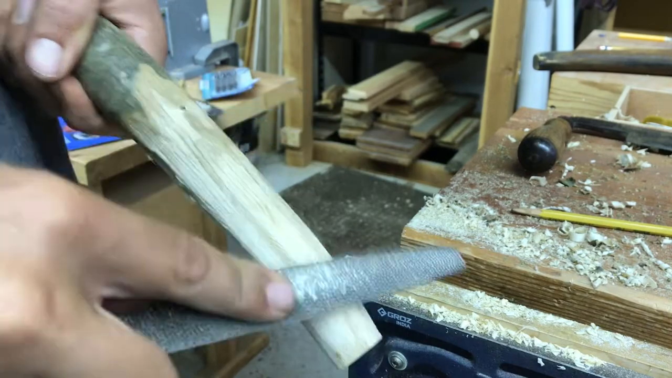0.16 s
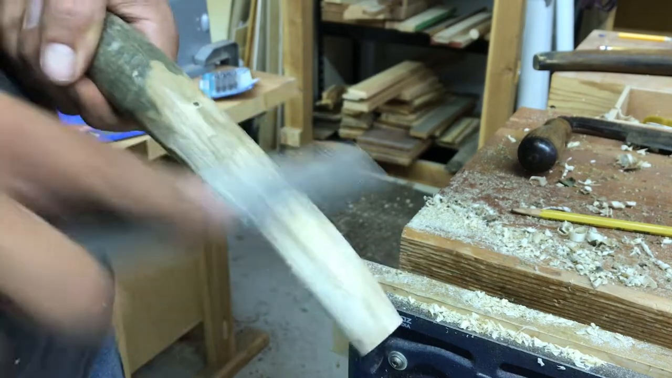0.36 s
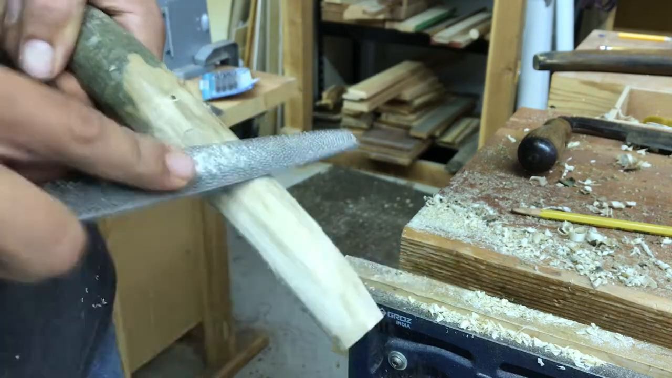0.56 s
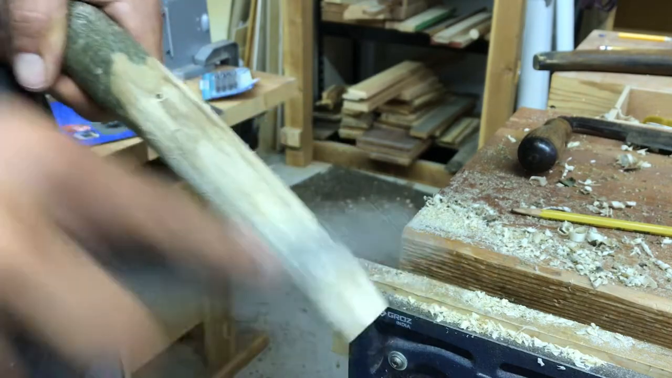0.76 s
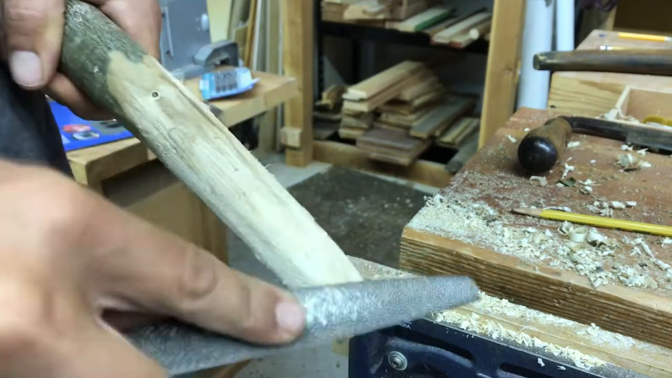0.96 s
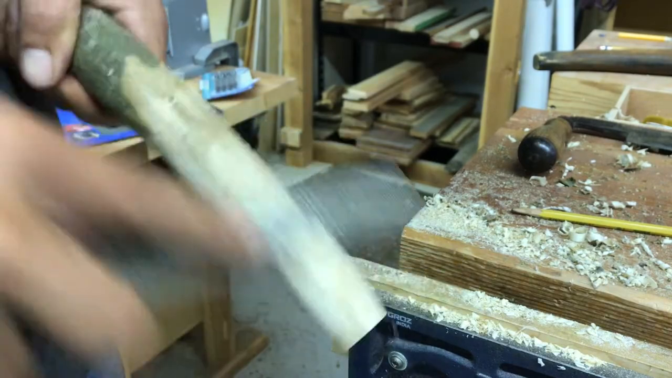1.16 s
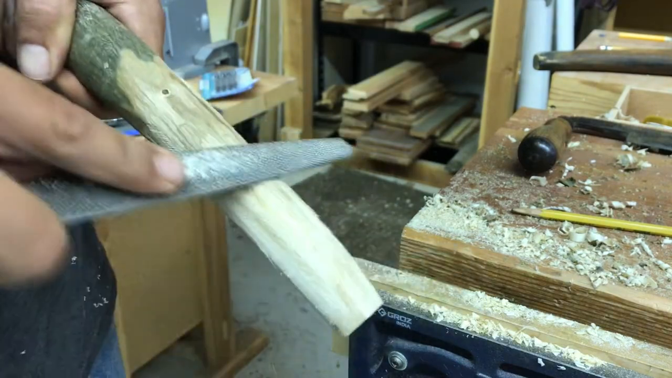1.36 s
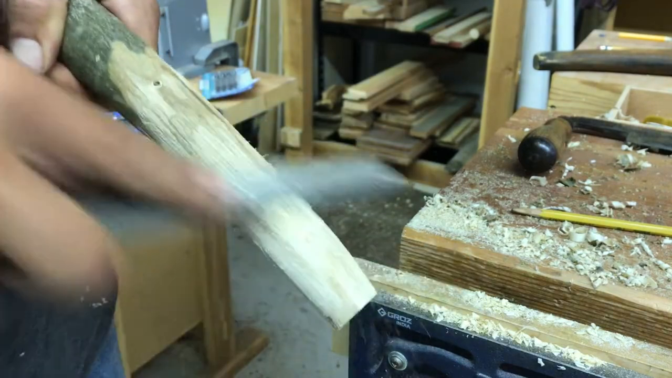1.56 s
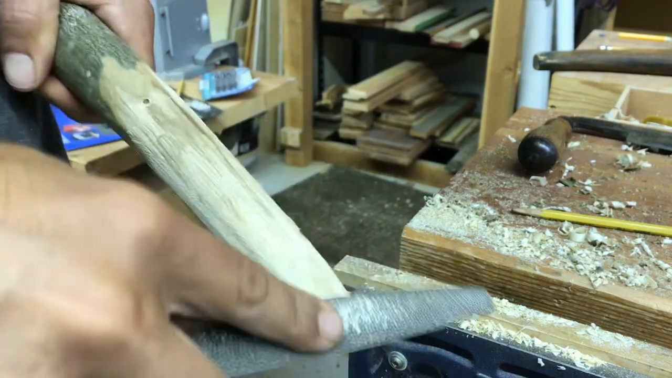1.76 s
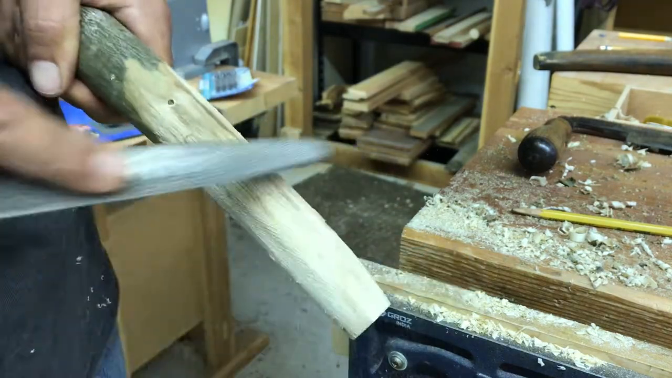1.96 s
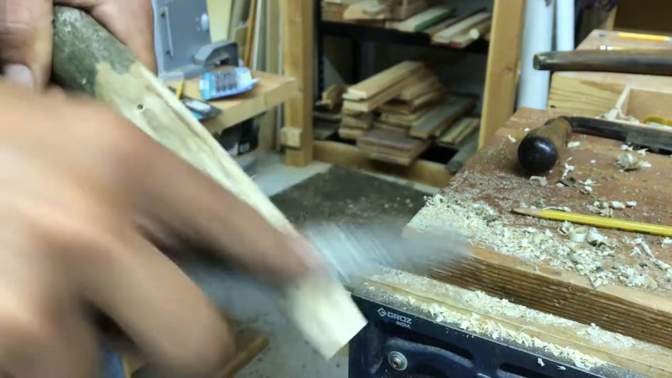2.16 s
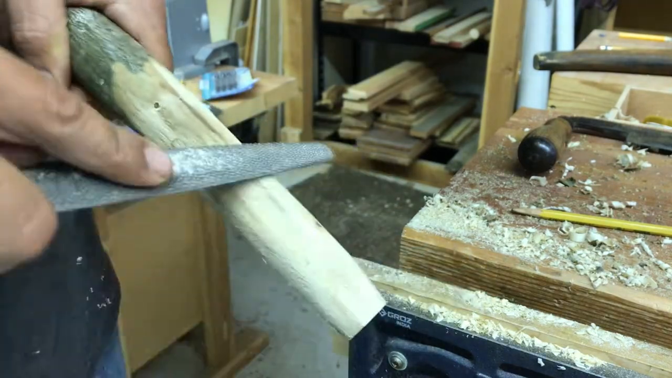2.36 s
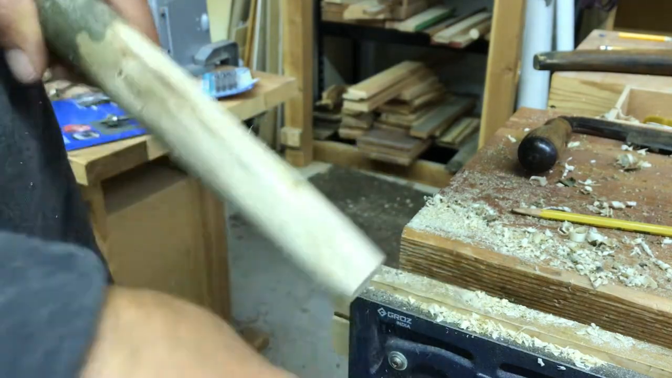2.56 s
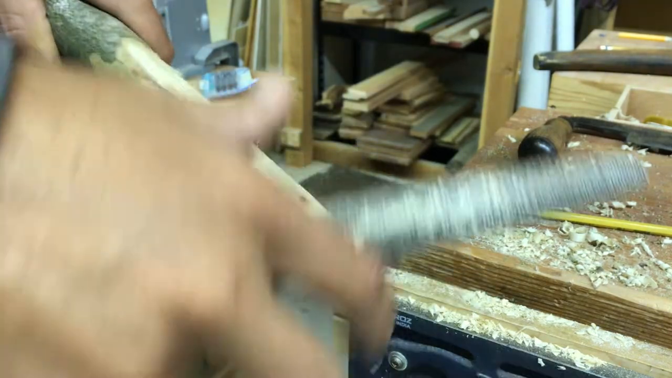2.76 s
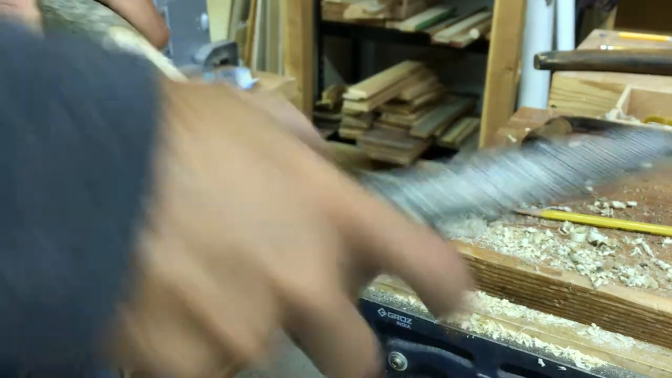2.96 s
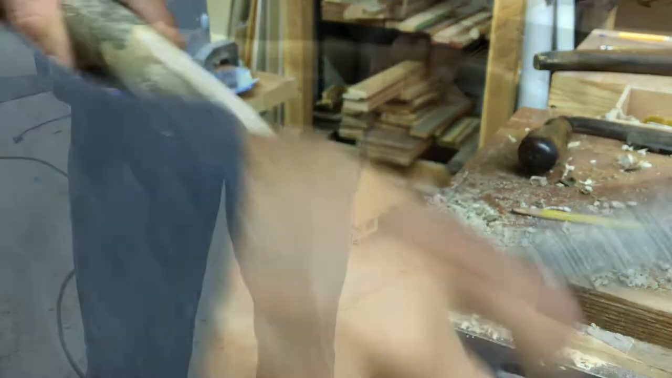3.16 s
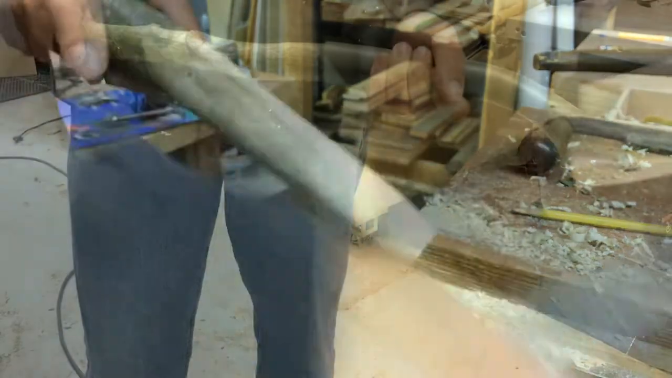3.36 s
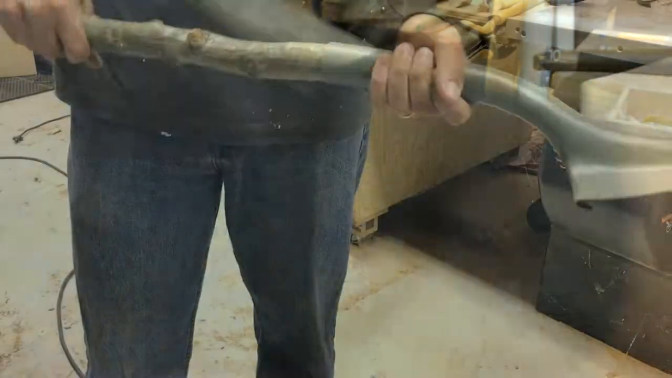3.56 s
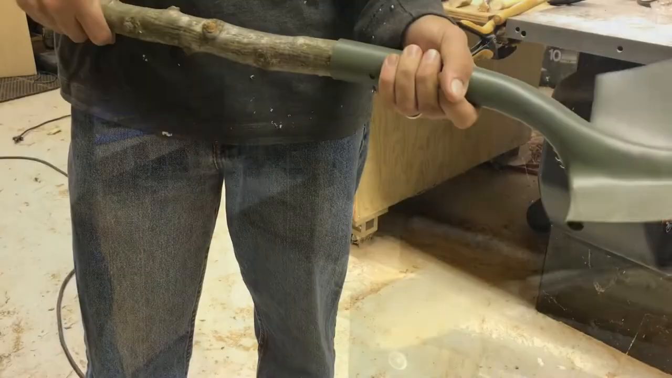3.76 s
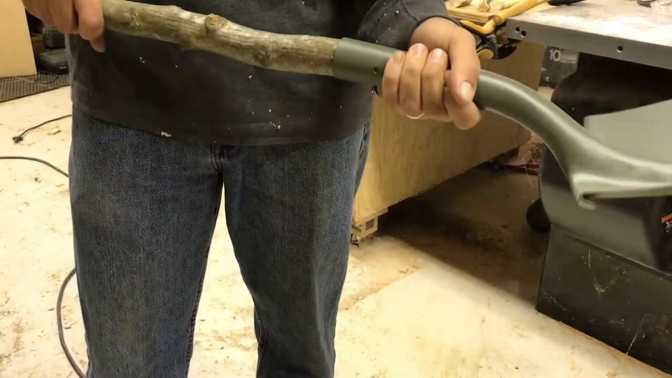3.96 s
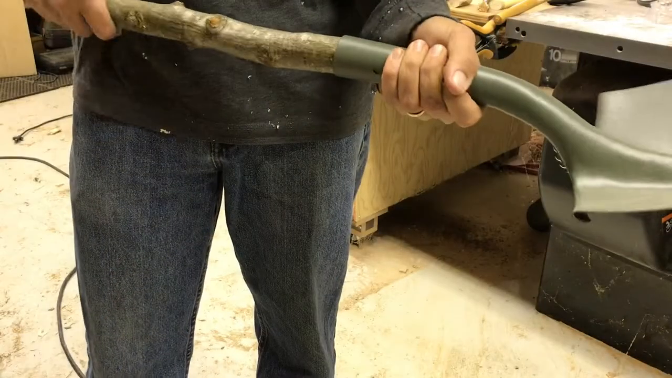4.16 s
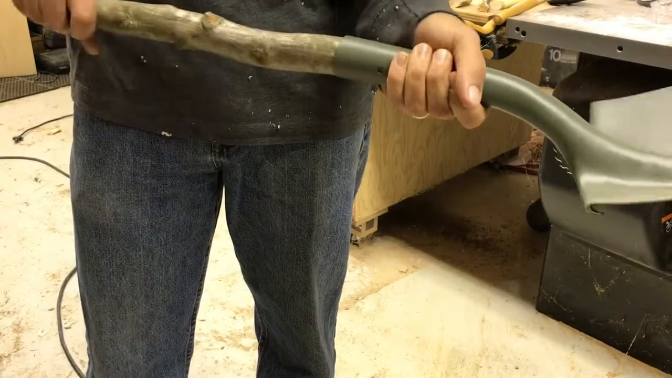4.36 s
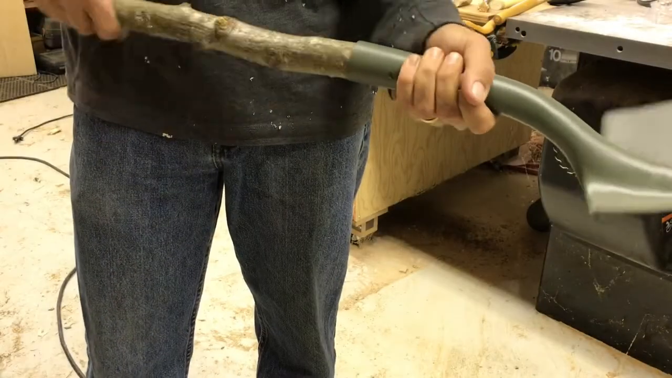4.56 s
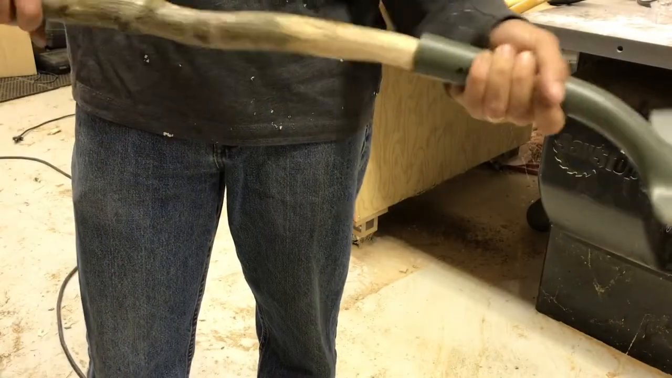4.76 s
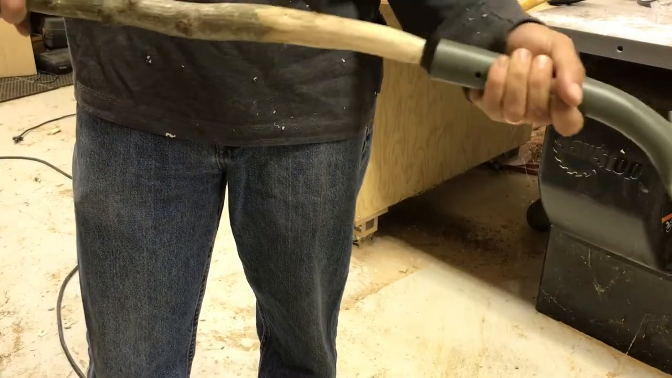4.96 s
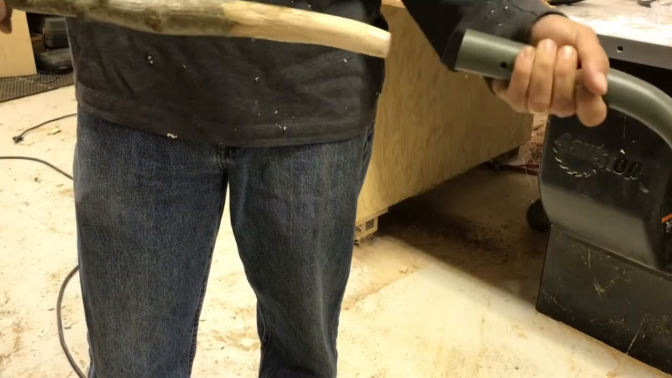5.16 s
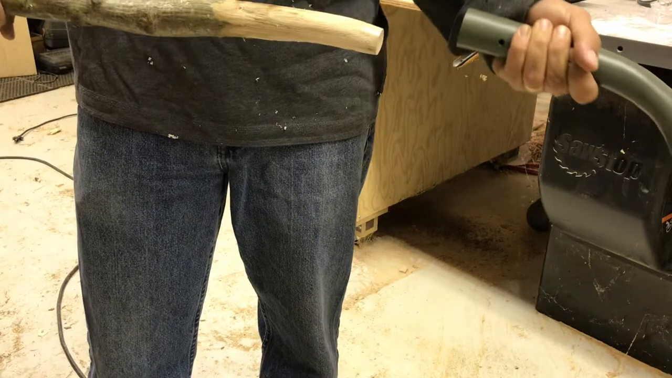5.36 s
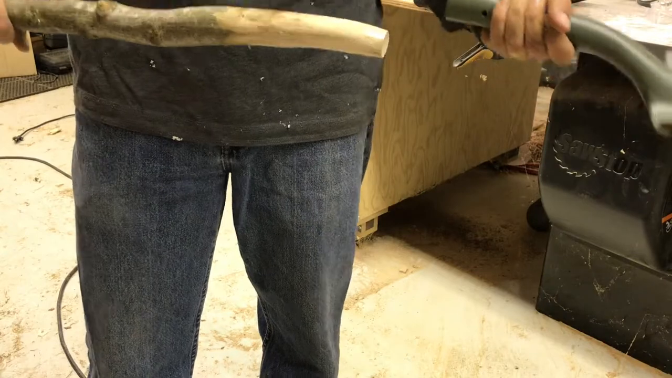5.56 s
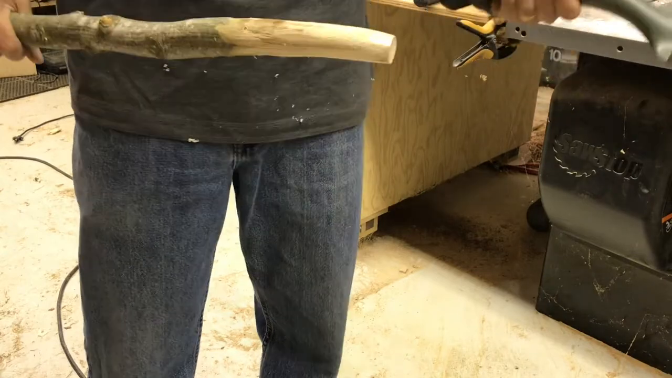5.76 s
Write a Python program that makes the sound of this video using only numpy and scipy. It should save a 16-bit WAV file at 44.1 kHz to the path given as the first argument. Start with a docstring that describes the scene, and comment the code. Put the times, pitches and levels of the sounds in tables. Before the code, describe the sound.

A steel rasp scrapes quickly back and forth on wood, a sharp knock follows, then wood grinds and pops free of a ringing metal socket.

```python
"""A low, wavering workshop hum, rumble and room hiss lie under everything.
First a steel rasp strokes to and fro over a branch held against a bench vice: noisy tooth bites drive wood, bench
and steel resonances. Small ticks and taps of the rasp on the branch come among the last strokes.
Then the branch jerks in a shovel's steel socket, with two more ticks among the later jerks: grinding noise drives
the steel, and knocks sound the air in the tube and a damped blade. At last it pops free and the blade rings undamped."""
import sys
import numpy as np
from scipy import signal
from scipy.fft import rfft, irfft, next_fast_len
from scipy.io import wavfile
from scipy.ndimage import uniform_filter1d, map_coordinates

SR = 44100
rng = np.random.default_rng(int(sys.argv[2]) if len(sys.argv) > 2 else 0)


def output_pcm(signal):
    """Save a mono or channel-first signal as 16-bit PCM at the path in sys.argv[1].

    Samples are clipped to [-1, 1] before scaling.
    """
    pcm = np.clip(np.atleast_2d(signal).T, -1, 1) * 32767
    wavfile.write(sys.argv[1], SR, np.round(pcm).astype(np.int16))


N = 255780
TIME = np.arange(N) / SR


def amp(db):
    """Gain of a level in dB."""
    return 10 ** (np.asarray(db) / 20)


def unit(x):
    """x at rms 1."""
    return x / np.sqrt(np.mean(x ** 2) + 1e-20)


def along(points, hz):
    """(Hz, value) points joined up on a log frequency axis."""
    f, v = np.transpose(points)
    return np.interp(np.log(hz + 1), np.log(f + 1), v)


def curves(rows):
    """One value per sample for each column after the time."""
    s, *columns = np.transpose(rows)
    return [np.interp(TIME, s, column) for column in columns]


def wobble(rate):
    """A smooth random curve with rate knots a second."""
    knots = rng.standard_normal(int(N * rate / SR) + 4)
    return map_coordinates(knots, [TIME * rate])


def filtered(x, response):
    """x through a complex response of frequency."""
    m = next_fast_len(N + SR // 2)  # spare length for the ringing
    spectrum = rfft(x, m) * response(np.fft.rfftfreq(m, 1 / SR))
    return irfft(spectrum, m)[..., :N]


def body(modes):
    """Causal response of a struck or shaken body: a sum of (Hz, width, dB) resonances of alternate sign."""
    def response(f):
        total = 0
        for k, (centre, width, db) in enumerate(modes):
            resonance = 1j * f * width / (centre * centre - f * f + 1j * f * width)
            total = total + (-1) ** k * amp(db) * resonance
        return total
    return response


def colour(points):
    """Response of a (Hz, dB) spectrum."""
    return lambda f: amp(along(points, f))


def bites(scatter_db, clump_db, clump_rate):
    """Dense small bites: noise with scattered sizes that come in clumps."""
    size_db = scatter_db * rng.standard_normal(N) + clump_db * wobble(clump_rate)
    return unit(rng.standard_normal(N) * amp(size_db))


def patchy(x, patchy_db):
    """x with patches of random gain over time and frequency."""
    z = signal.stft(x, nperseg=256)[2]
    field = uniform_filter1d(rng.standard_normal(z.shape), size=4, axis=0)  # smooth over frequency
    field = uniform_filter1d(field, size=7, axis=1)  # smooth over time
    return unit(signal.istft(z * amp(patchy_db * unit(field)), nperseg=256)[1][:N])


def driven(force, gain, response):
    """The force under its gain through a response, scaled so that steady force gives rms 1."""
    return filtered(force * gain, response) / np.std(filtered(force, response))


def movement(start, up, down, power):
    """Span, loudness and share of the way done for a hand whose speed swells and falls as a sine.

    Loudness goes with a power of the speed: power = (while speeding up, while slowing down).
    """
    span = slice(max(round(start * SR), 0), round((start + up + down) * SR))
    t = TIME[span] - start
    swell = np.abs(np.sin(np.pi / 2 * t / up)) ** power[0]
    fall = np.abs(np.cos(np.pi / 2 * (t - up) / down)) ** power[1]
    return span, np.where(t < up, swell, fall), t / (up + down)


# rumble and hiss before their trims: t/s, rumble level/dB, hiss level/dB
ROOM_LEVELS = [(0.0, -51, -61), (1.9, -53.5, -63), (3.07, -52, -66.5), (3.8, -54, -71), (4.5, -52.5, -65.5),
               (5.45, -53.5, -69.5)]
# hum before it wavers: t/s, f/Hz, level/dB
HUM_PATH = [(0, 98.54, -74), (3.3, 98.3, -51), (3.7, 90.1, -64.5), (4.4, 80.8, -57.5), (5.0, 89.16, -53),
            (5.8, 83.7, -66)]
# rumble spectrum: f/Hz, relative level/dB
RUMBLE_SPECTRUM = [(15, -45), (25, -54), (48, 2), (92, 6), (109, 1.5), (124, -30), (150, -5), (200, -43),
                   (330, -120)]
# hiss spectrum: f/Hz, relative level/dB
HISS_SPECTRUM = [(70, -29.5), (120, -10.5), (170, -7), (350, -8.5), (450, -14), (1000, -14.5), (2000, -20),
                 (3100, -23), (6500, -31), (8000, -32.5), (10500, -35), (12500, -32.5), (15200, -32.5),
                 (15700, -65.5)]


def workshop():
    """A sine hum wavering in pitch and level, over two bands of shaped noise: low rumble and room hiss."""
    rumble_db, hiss_db = curves(ROOM_LEVELS)
    hum_hz, hum_db = curves(HUM_PATH)
    waver_db = 2 * wobble(16)
    hum_cycles = np.cumsum(hum_hz + 3.35 * wobble(8.7)) / SR
    hum = amp(hum_db + waver_db) * np.sin(2 * np.pi * hum_cycles)
    rumble = unit(filtered(rng.standard_normal(N), colour(RUMBLE_SPECTRUM)))
    flickering_noise = rng.standard_normal(N) * amp(0.35 * wobble(25.03))
    hiss = unit(filtered(flickering_noise, colour(HISS_SPECTRUM)))
    return hum + amp(rumble_db - 4.0) * rumble + amp(hiss_db + 6) * hiss


# rasp strokes: start t/s, speeding up t/s, slowing down t/s, teeth level/dB, then relative to the teeth:
# branch level/dB, its upper modes level/dB, bench thrum level/dB; last, branch gain along the stroke/dB
RASP_STROKES = [(-.02, 0.1, 0.01, -43.5, -5.5, -5, -8.5, 5), (0.103, 0.089, 0.07, -38.5, -7, -3.5, -6, 11),
                (.26, 0.074, 0.041, -46.5, -5.5, -4, -7, -4),
                (0.413, 0.049, 0.068, -36.5, -6.5, -4.5, -7, 15),
                (0.537, .065, 0.044, -45, -5.5, -8.5, 0, -8), (0.667, 0.072, 0.052, -40.5, 0, 1, -3, 13),
                (0.794, 0.038, 0.0093, -47.5, 5.5, 0, 0, -11), (0.838, 0.028, 0.053, -44, -4.5, -4, 0, -3),
                (0.923, 0.084, 0.044, -39.5, -2.5, 1, -3.5, 12),
                (1.063, 0.036, 0.076, -43.5, -2, -4.5, -0.5, -10),
                (1.196, .055, 0.047, -39.5, -4, -0.5, -6.5, 11), (1.32, 0.053, 0.058, -46, 0, -3, -0.5, 3),
                (1.452, .06, 0.045, -36.5, -4.5, -0.5, -5, 8),
                (1.575, 0.069, 0.042, -43.5, -4, -5.5, -2, -5), (1.719, 0.051, .08, -36.5, 0, 2, -4.5, 7),
                (1.853, 0.061, 0.012, -57, 10, 3.5, 6, -3), (2.083, 0.074, 0.12, -33.5, -2.5, 0, -4.5, 14),
                (2.435, .1, 0.025, -33, -2, -3, -5.5, 13), (2.975, 0.061, 0.14, -51.5, -7, -8.5, -5.5, -19)]
# teeth catch on a ridge and jolt the branch: start t/s, length t/s, low modes level/dB, upper modes level/dB
RIDGE_CATCHES = [(0.063, .025, -43, -56), (0.11, 0.034, -37, -40.5), (0.415, 0.018, -48, -44.5),
                 (0.94, 0.019, -46, -36), (2.083, 0.022, -47, -58), (2.54, 0.019, -31.5, -30.5),
                 (2.979, 0.021, -36, -49.5), (3.011, 0.05, -40.5, -46.5)]
STROKE_POWER, CATCH_POWER = (1.05, 1.8), (1.1, 4.5)  # of the speed: (speeding up, slowing down)
BODY_FOLLOWS = 0.82  # the bodies swing less than the teeth: exponent on the stroke's loudness
CATCH_RISE = 0.4  # share of a catch spent rising


def stroke_gains():
    """Gains of teeth, branch, its upper modes and bench; the contact travels, so the branch swells or fades."""
    out = np.zeros((4, N))
    for start, up, down, db, low_db, high_db, thrum_db, travel_db in RASP_STROKES:
        span, shape, way = movement(start, up, down, STROKE_POWER)
        soft = shape ** BODY_FOLLOWS
        low = soft * amp(low_db + travel_db * (way - .5))
        out[:, span] += amp(db) * np.array([shape, low, soft * amp(high_db), soft * amp(thrum_db)])
    for start, length, low_db, high_db in RIDGE_CATCHES:
        span, shape, _ = movement(start, CATCH_RISE * length, (1 - CATCH_RISE) * length, CATCH_POWER)
        out[1:3, span] += amp([[low_db], [high_db]]) * shape
    return out


# branch resonances: f/Hz, width f/Hz, relative level/dB
BRANCH_MODES = [(818, 90, -3.5), (1041, 116, 2), (1186, 114, 1), (1312, 75, 1.5), (1530, 247, -3),
                (1786, 67, 4.5), (1934, 133, -5.5), (2560, 520, -23.5)]
# bench resonances: f/Hz, width f/Hz, relative level/dB
BENCH_MODES = [(214, 108, -4.5), (305, 47, 3.5), (422, 155, -2.5), (562, 87, -1), (680, 63, -1)]
# resonances of the rasp's steel: f/Hz, width f/Hz, relative level/dB
RASP_MODES = [(2880, 90, -4), (3540, 70, -1), (3760, 70, 1), (4530, 90, 2), (5380, 120, 1), (6230, 110, -5),
              (6830, 150, -7), (8830, 120, -5), (9490, 100, -3), (12300, 400, -6), (14300, 500, -4)]
# spectrum of tearing wood: f/Hz, relative level/dB
FIBRE_SPECTRUM = [(1290, -44), (2200, 1.5), (3010, -3.5), (3460, -0.5), (4080, -4), (5350, -9), (6790, -9),
                  (12200, -9), (15700, -17)]


def rasp():
    """The teeth tear fibres, and each bite shakes the branch, the bench under it and the steel."""
    teeth, low, high, thrum = stroke_gains()
    force = bites(scatter_db=1.5, clump_db=2.0, clump_rate=220)
    wood = driven(force, low, body(BRANCH_MODES[:4])) + driven(force, high, body(BRANCH_MODES[4:]))
    bench = driven(force, thrum, body(BENCH_MODES))
    steel = driven(patchy(force, patchy_db=4.0), teeth, body(RASP_MODES))
    tearing = patchy(bites(scatter_db=4, clump_db=1.5, clump_rate=140), patchy_db=4.5)
    fibres = driven(tearing, teeth, colour(FIBRE_SPECTRUM))
    return wood + bench + amp(-5.5) * steel + amp(-2.0) * fibres


# chips and fingers ticking: t/s, level/dB before the treble filter, length t/s
TICK_EVENTS = [(1.884, -51, .004), (1.894, -51, .004), (1.904, -52, .004), (1.913, -48.5, .004),
               (2.656, -55.5, .022), (2.726, -58.5, 0.0049), (2.748, -56.5, 0.0088), (4.1, -54, .004),
               (4.382, -46, .003)]


def ticks():
    """Tiny dry puffs of treble: noise under bell-shaped envelopes, thinned below 7 kHz."""
    envelope = np.zeros(N)
    for s, db, length in TICK_EVENTS:
        half = length / 2
        envelope += amp(db) * np.exp(-((TIME - s - half) / half) ** 2)
    return filtered(envelope * rng.standard_normal(N), lambda f: 1 / (1 + (7000 / (f + 1)) ** 4))


# taps of the rasp on the branch: t/s, overall level/dB, contact softness f/Hz, then parts within the tap:
# lowest modes level/dB, upper modes level/dB, crack level/dB, rasp steel level/dB
TAP_EVENTS = [(2.0669, -21.5, 2970, -1, 1.5, -22, 0.5), (2.428, -22.5, 6000, -3, -1.5, -1.5, -14.5),
              (2.9606, -28.5, 6070, -6.5, -11, 4.5, -8), (2.9615, -4, 2230, -8, -2.5, -10, -19.5)]
TAP_DAMPING = 1.3  # the steel's modes widen by this factor while it rests on the wood


def taps():
    """A tap is a blow on branch, bench and rasp with a short crack; a softer contact dulls them all."""
    out, t, f = np.zeros(N), TIME[:8192], np.fft.rfftfreq(8192, 1 / SR)
    damped_steel = body([(hz, TAP_DAMPING * width, level) for hz, width, level in RASP_MODES])(f)
    lowest, middle = body(BRANCH_MODES[:2])(f), body(BRANCH_MODES[2:4])(f)
    upper, bench = body(BRANCH_MODES[4:])(f), body(BENCH_MODES[2:])(f)
    for s, db, soft_hz, low_db, high_db, crack_db, steel_db in TAP_EVENTS:
        bodies = amp(low_db) * lowest + middle - amp(high_db) * upper
        bodies = bodies + amp(-7) * bench + amp(steel_db) * damped_steel
        crack = rfft(amp(crack_db - 60 * t / .009) * rng.standard_normal(len(t)))  # t60 9 ms
        softness = (1 + 1j * f / soft_hz) ** 2
        out[round(s * SR):][:len(t)] += amp(db) * irfft((amp(30.5) * bodies + crack) / softness)
    return out


# jerks of the branch in the socket: start t/s, speeding up t/s, slowing down t/s, steel level/dB,
# then relative to the steel: its upper modes level/dB, grit level/dB
SOCKET_JERKS = [(3.151, 0.017, 0.037, -50, 3.5, -15), (3.339, 0.039, 0.11, -69, 3, 12.5),
                (3.392, 0.015, 0.027, -54.5, -4, -18), (3.421, 0.0099, .025, -58.5, 0, 1),
                (4.085, 0.032, 0.04, -64.5, -13, 4.5), (4.16, 0.015, 0.014, -64, 2, -1),
                (4.203, 0.013, 0.034, -49.5, 5, 4.5), (4.352, 0.018, 0.019, -61, -4, 3),
                (4.381, .025, 0.036, -41.5, -2, 0.5), (4.518, .016, 0.029, -40.5, -0.5, -18),
                (4.558, 0.032, 0.034, -44.5, 2.5, 2.5), (4.622, 0.0076, 0.013, -58, 3, -5),
                (4.678, 0.04, 0.14, -42, -4, 1.5), (4.789, 0.017, 0.082, -45, -3, 0.5)]
JERK_POWER = (1.6, 4.3)  # of the speed: (speeding up, slowing down)


def jerk_gains():
    """Gains of the socket's low modes, its upper modes and the grit over all jerks."""
    out = np.zeros((3, N))
    for start, up, down, db, high_db, grit_db in SOCKET_JERKS:
        span, shape, _ = movement(start, up, down, JERK_POWER)
        out[:, span] += amp(db) * amp([[0], [high_db], [grit_db]]) * shape
    return out


# socket resonances: f/Hz, width f/Hz, relative level/dB
SOCKET_MODES = [(417, 190, 0.5), (765, 390, -3), (1154, 138, 8.5), (1493, 190, 11.5), (2090, 170, -5)]
# grit spectrum: f/Hz, relative level/dB
GRIT_SPECTRUM = [(1290, -36), (2200, 1), (3190, 7), (4880, -3), (6050, 2.5), (7370, -8.5), (9050, -2.5),
                 (13000, -8.5), (15700, -6)]
# narrow steel modes that linger: f/Hz, width f/Hz, relative level/dB
COLLAR_MODES = [(1721, 9, 6), (1805, 9, 7), (3100, 40, -8), (3470, 30, -6), (4450, 25, -7), (5350, 25, -4),
                (6650, 25, -7)]


def socket_grind():
    """The branch grinds in the socket: rough friction shakes the steel and adds a gritty noise."""
    low, high, grit = jerk_gains()
    force = bites(scatter_db=4, clump_db=1.0, clump_rate=110)
    steel = driven(force, low, body(SOCKET_MODES[:3])) + driven(force, high, body(SOCKET_MODES[3:]))
    grinding = driven(patchy(force, patchy_db=-1.5), grit, colour(GRIT_SPECTRUM))
    lingering = driven(force, high + grit, body(COLLAR_MODES))
    return steel + grinding + amp(-14.0) * lingering


def ring(modes, t, tilt_db):
    """Decaying modes of alternate sign, each blow at new strengths; its place tilts them to high or low."""
    out = 0
    for k, (hz, db, t60) in enumerate(modes):
        strength_db = db + tilt_db * np.log2(hz / 1000) + rng.normal(0, 1)
        out = out + (-1) ** k * amp(strength_db - 60 * t / t60) * np.sin(2 * np.pi * hz * t)
    return out


# knocks of the branch in the socket: t/s, overall level/dB, hollow note f/Hz, then parts within the knock:
# note level/dB, blade ring level/dB, blade tilt/dB per octave, crack level/dB before its boost
KNOCK_EVENTS = [(3.431, -50, 910, -30, -6.5, 12, -6), (3.9565, -35.5, 1830, -16, -33, -5, -6),
                (4.214, -39.5, 392, 1.5, -35, 8, -22), (4.53, -32, 870, -23, -14, 6, -11),
                (4.79, -31, 800, -4, -32, 0, -7), (4.802, -22, 877, -0.5, -10.5, 6.5, -6),
                (4.816, -24, 888, 1, -25, 2.5, -26), (4.9031, -26.5, 938, 4, -4.5, 6.5, -0.5)]
# blade modes before tilt, scatter and grip: f/Hz, level/dB, t60 t/s
BLADE_MODES = [(462, -20, 0.7), (603, -8, 0.35), (710, -3, 0.12), (1010, -10, 0.078), (1153, -26, 1.2),
               (1803, -18, 0.25), (2030, -31, .3), (2440, -24, 0.12), (3630, -35, 0.08), (4000, -28, .06),
               (6050, -29, .04)]
# close blade modes that beat, before tilt, scatter and grip: f/Hz, level/dB, t60 t/s
BEATING_MODES = [(1552, -11.5, 1.0), (1575.5, -11, .45)]
# air in the socket: share the note starts lower, rise time t/s, t60 t/s
HOLLOW_AIR = (0.022, 0.0033, 0.057)
FREE_S, GRIP_DB_PER_S = 4.9, 90  # until it pops free, the branch damps the blade


def knocks():
    """Each knock sounds the air in the tube, rings the blade and adds a short crack."""
    out, t = np.zeros(N), TIME[:SR]
    lower, rise, t60 = HOLLOW_AIR
    glide = np.cumsum(1 - lower * np.exp(-t / rise)) / SR  # the note rises as the mouth of the tube opens
    onset = 1 - np.exp(-t / 0.00038)
    crack_band = signal.butter(3, [700, 3800], "bandpass", fs=SR)
    for s, db, note_hz, note_db, blade_db, tilt_db, crack_db in KNOCK_EVENTS:
        crack_noise = amp(6 - 60 * t / .014) * rng.standard_normal(SR)  # t60 14 ms
        crack = signal.lfilter(*crack_band, crack_noise)
        note = amp(note_db - 60 * t / t60) * np.sin(2 * np.pi * note_hz * glide)
        grip_db = GRIP_DB_PER_S * (s < FREE_S) * t
        blade = amp(blade_db - grip_db) * ring(BLADE_MODES + BEATING_MODES, t, tilt_db)
        hit = onset * (note + blade) + amp(crack_db) * crack
        start = round(s * SR)
        out[start:start + SR] += amp(db) * hit[:N - start]
    return out


# decay of the walls' answer: f/Hz, t60 t/s
WALL_DECAY = [(200, 0.37), (1500, 0.29), (5000, 0.44), (12000, 0.11)]


def room(x):
    """The walls answer 300 samples late with a noise tail; each frequency dies at its own speed."""
    hz, t, z = signal.stft(rng.standard_normal(SR // 2), SR, nperseg=256)
    decay = amp(-60 * t / along(WALL_DECAY, hz)[:, None])
    tail = signal.istft(z * decay, SR, nperseg=256)[1]
    return signal.fftconvolve(np.pad(x, (300, 0)), tail / np.linalg.norm(tail))[:N]


def scene():
    """Workshop bed, then rasp, ticks and taps, then shovel work; the last two have their own room answers."""
    bed = workshop()
    bench = rasp() + ticks() + taps()
    shovel = socket_grind() + knocks()
    near = bench + shovel
    answer = amp(-17.5) * room(bench) + amp(-14) * room(shovel)
    return (bed + near + answer)[None]


TOP_HZ = 15800


def record(dry):
    """A sharp band limit: nothing passes from TOP_HZ upwards."""
    return filtered(dry, lambda hz: hz < TOP_HZ)


dry = scene()
out = record(dry)
output_pcm(out)
```